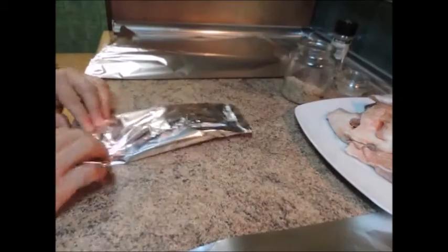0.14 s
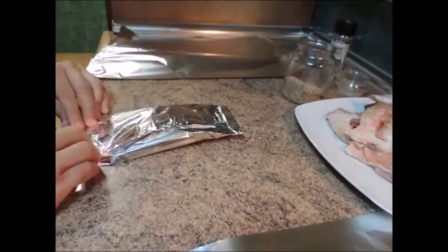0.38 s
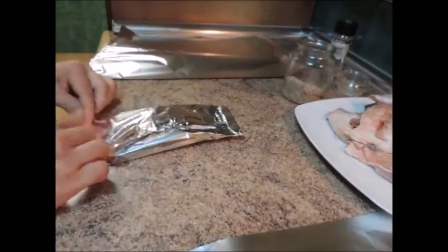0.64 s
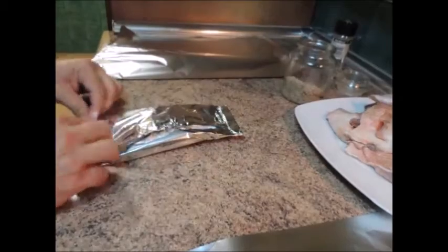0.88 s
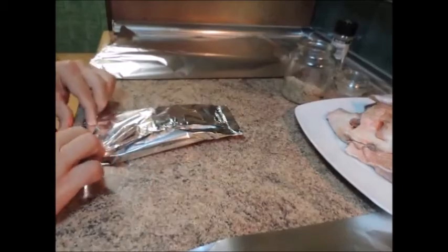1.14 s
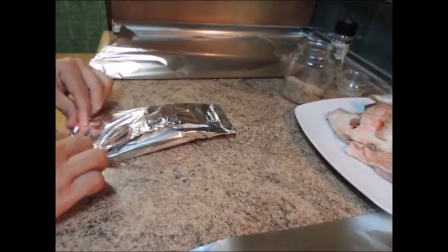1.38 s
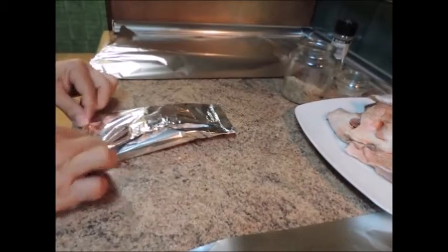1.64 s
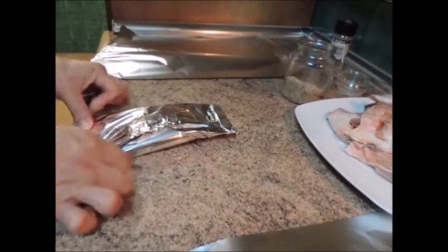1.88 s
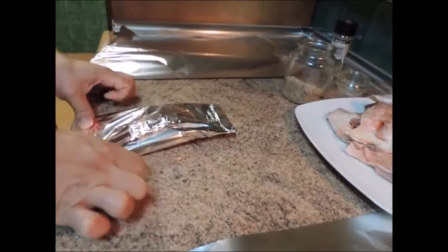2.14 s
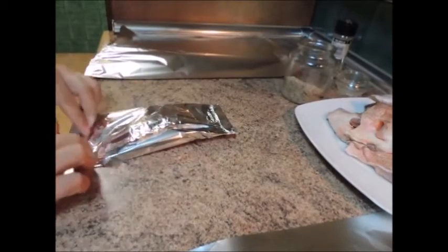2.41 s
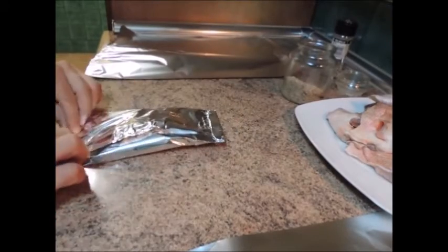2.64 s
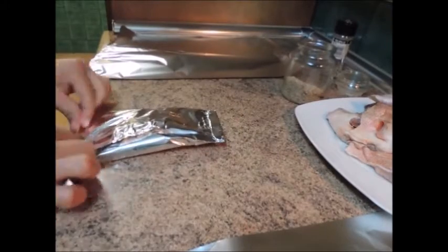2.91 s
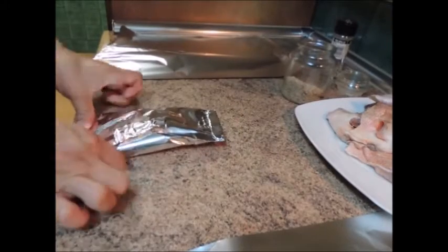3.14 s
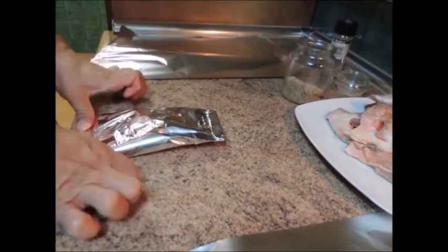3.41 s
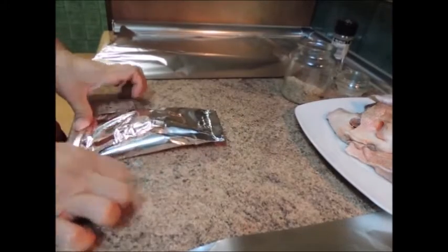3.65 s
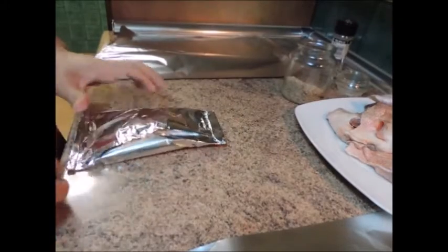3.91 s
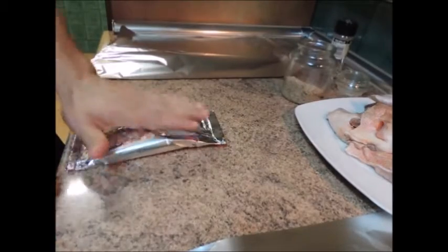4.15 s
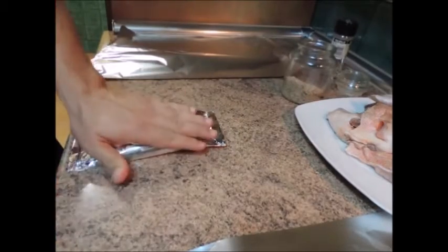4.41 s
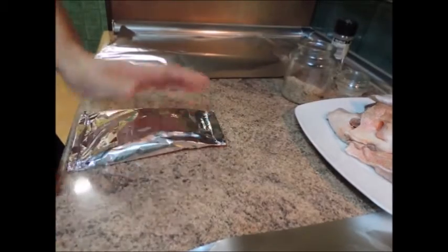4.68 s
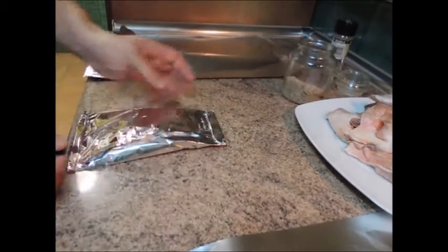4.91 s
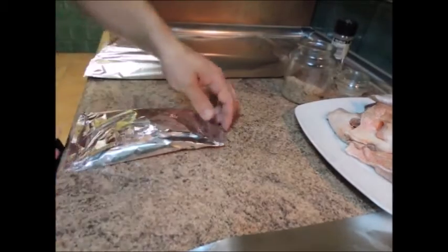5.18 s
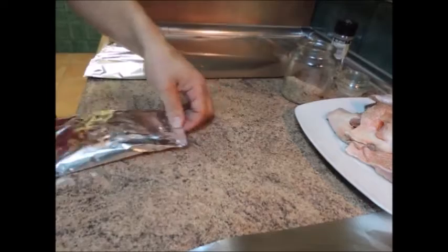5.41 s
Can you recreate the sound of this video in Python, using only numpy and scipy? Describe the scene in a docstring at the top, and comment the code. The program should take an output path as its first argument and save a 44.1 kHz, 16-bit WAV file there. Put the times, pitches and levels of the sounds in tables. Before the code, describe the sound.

Fingers crimp a foil packet shut: sharp opening crunches, then swarms of tiny metallic clicks with brief gaps. A hard snap lands around two and a half seconds, followed by dense crackle. Pressing gives another crisp cluster past four seconds, then near silence, a soft knock and a last burst. Two close microphones, short lively room reflections, low hiss and barely audible hum.

```python
"""Folding aluminium foil in a kitchen

Hands fold and crimp foil on a stone worktop in a small hard room. Each buckle is a click that sets many small
rings going; buckles come in swarms while a grip works the sheet and in short avalanches at big creases.
Fingers knock the worktop: rough bursts that set low rings going. The foil reaches the left of two close
microphones first. Behind it lie filtered noise as hiss and an appliance's faint hum, a ring fed with noise."""
import sys
import numpy as np
from scipy import signal
from scipy.io import wavfile

SR = 44100
rng = np.random.default_rng(int(sys.argv[2]) if len(sys.argv) > 2 else 0)


def invert_db(x):
    """Field ratio 10**(x/20) for x, a level in decibels (scalar or array-like)."""
    u = np.asarray(x, float) / 20
    return 10 ** u


def file_out(sig):
    """Save sig as 16-bit WAV at sys.argv[1]."""
    # one column per channel
    cols = np.atleast_2d(sig).T
    # limit, then scale
    lim = np.clip(cols, -1, 1)
    pcm = np.round(lim * 32767).astype(np.int16)
    wavfile.write(sys.argv[1], SR, pcm)


N = 244755   # length in samples

# big creases giving way: t/s, level/dB, fullness/dB (extra weight of the low rings), avalanche length/s
BIG_CREASES = [(0.031, -14.5, -7.5, 0.011), (0.098, -13, -6, .013), (0.123, -14, -3, 0.013),
               (0.2, -22, -1, .008), (0.243, -23.5, -7, 0.0059), (0.3, -25, -3, 0.0078),
               (0.481, -27.5, -5.5, 0.01), (0.607, -18.5, -4, .017), (0.81, -22, -2, .028),
               (0.91, -21, -3, 0.0099), (0.969, -18, -5, .019), (1.002, -19.5, -4, 0.012),
               (1.07, -27, -7, 0.0089), (1.177, -38, -4, 0.02), (1.241, -28, -0.5, .0093),
               (1.295, -30.5, -10, 0.0098), (1.355, -21.5, -31, .013), (1.442, -24.5, -14, 0.011),
               (1.557, -26, -8.5, 0.045), (1.619, -27.5, -8, 0.022), (1.747, -22, -8, 0.0097),
               (1.772, -18, -3.5, .0077), (1.862, -21.5, -18, 0.015), (1.897, -25, -.5, .019),
               (1.937, -19, -5.5, 0.019), (2.027, -23, -2.5, .014), (2.062, -20.5, 1, .025),
               (2.105, -16.5, -6, 0.008), (2.145, -25, -13, 0.01), (2.266, -29.5, -4.5, 0.015),
               (2.403, -24.5, -8.5, .021), (2.438, -28.5, 0.5, 0.0095), (2.502, -11.5, -4, 0.007),
               (2.659, -24.5, -6, 0.0087), (2.714, -21, -2.5, 0.01), (2.727, -21.5, -2.5, 0.0082),
               (2.777, -22.5, -5, 0.008), (2.831, -19.5, -2, 0.016), (2.867, -17.5, -34, 0.0092),
               (2.923, -21.5, -7, .0067), (2.948, -23.5, -5, 0.0098), (2.968, -18.5, -5, 0.0083),
               (2.985, -21.5, -4.5, 0.0067), (3.033, -21.5, -14, 0.0078), (3.095, -17, -8.5, .0094),
               (3.149, -22, -6, 0.01), (3.201, -23.5, -6, 0.025), (3.29, -23, -5, 0.012),
               (3.365, -24.5, 4.5, 0.0074), (3.466, -27, -12, 0.00634), (3.571, -18.5, -1.5, 0.0055),
               (3.665, -33, 3.5, .021), (3.754, -27.5, -8, 0.012), (3.83, -22.5, -3.5, 0.02),
               (3.941, -28, -9, 0.0074), (4.253, -26.5, -5, 0.022), (4.332, -28.5, 1, .0094),
               (4.361, -22, -1, 0.0095), (4.383, -21.5, -1, .039), (4.431, -22.5, -4, 0.012),
               (4.48, -24, -2, 0.017), (4.513, -19.5, -1, .015), (4.635, -21, 7.5, 0.0043),
               (4.676, -15, -4, 0.01), (4.821, -42, 6, .008), (5.156, -42.5, 7.5, 0.017),
               (5.248, -23.5, -5.5, 0.013), (5.326, -27.5, -2, .011), (5.429, -19.5, -6, 0.018),
               (5.468, -16, -21, .0069), (5.495, -28, -21, .005)]


def at_hz(points, hz):
    """Reads a table of (f/Hz, value) between its points, on a log-frequency axis."""
    table_hz, values = np.transpose(points)
    return np.interp(np.log(hz), np.log(table_hz), values)


def rms_one(x):
    """Scales a signal to rms 1."""
    return x / np.sqrt(np.mean(x ** 2) + 1e-20)


def ring(clicks, hz, t60):
    """A resonance: each unit click starts a sine of height 1 that falls by 60 dB in t60 seconds."""
    decay = invert_db(-60 / (t60 * SR))   # per sample
    turn = 2 * np.pi * hz / SR   # radians per sample
    return signal.lfilter([0, np.sin(turn)], [1, -2 * decay * np.cos(turn), decay ** 2], clicks + 1e-18)


def bands():
    """Half-octave band-pass filters from 16 Hz up, each with its centre in Hz."""
    edges = 16 * 2 ** np.arange(0, 10.1, .5)
    return [(np.sqrt(low * high), signal.butter(2, [low, high], "band", fs=SR, output="sos"))
            for low, high in zip(edges, edges[1:])]


def air():
    """Room and microphone hiss, most alike in both microphones in the bass, with a faint wavering hum."""
    # spectrum of the hiss before it is set to its overall level: f/Hz, level per Hz/dB
    hiss_spectrum = [(12, -33), (20, 2), (225, -4.5), (349, -7), (447, -6), (775, -11.5), (1580, -16.5),
                     (14300, -23.5)]
    # how alike left and right are: f/Hz, likeness (1 = the same, 0 = unrelated)
    likeness = [(40, 0.77), (200, 0.31), (1500, 0.3), (5000, 0.23)]
    hiss_db, hum_db = -49.5, -63   # rms levels
    white = rng.standard_normal((2, 2, N))
    hiss = 0
    for k, (hz, sos) in enumerate(bands()):
        mid, side = signal.sosfilt(sos, white[k % 2])   # neighbouring bands use separate noise
        alike = np.clip(at_hz(likeness, hz), -1, 1)
        both = np.sqrt(1 + alike) * mid + np.sqrt(1 - alike) * side * [[1], [-1]]
        hiss = hiss + invert_db(at_hz(hiss_spectrum, hz)) * both
    # noise keeps a resonance sounding, so its strength wavers
    hum = ring(rng.standard_normal((2, N)), hz=1575, t60=.06)
    return invert_db(hiss_db) * rms_one(hiss) + invert_db(hum_db) * rms_one(hum)


def kitchen(x, direct_db, scatter_db, scatter_t60, tail_db, alike_hz):
    """From one spot: direct sound, left first; scatter off worktop and walls; a tail dying band by band."""
    # how long the room rings: f/Hz, t60/s
    room_decay = [(500, 0.34), (4000, 0.31), (14000, 0.18)]
    t = np.arange(SR // 2) / SR
    noise = rng.standard_normal((2, 2, len(t)))
    scatter = noise[0] * invert_db(-60 * t / scatter_t60)
    tail = sum(signal.sosfilt(sos, noise[1]) * invert_db(-60 * t / at_hz(room_decay, hz)) for hz, sos in bands())
    tail = tail * np.clip(t / 0.009, 0, 1)   # the tail builds up over 9 ms
    parts = [(scatter_db, scatter), (tail_db, tail)]
    mid, side = sum(invert_db(db) * part / np.linalg.norm(part[0]) for db, part in parts)
    # lows reach both microphones alike
    side = signal.sosfilt(signal.butter(1, alike_hz, "high", fs=SR, output="sos"), side)
    path = np.array([mid + side, mid - side]) / np.sqrt(2)
    right_delay = rng.integers(2, 5)   # samples
    path[[0, 1], [0, right_delay]] += invert_db(direct_db)
    return signal.oaconvolve(x[None], path, axes=1)[:, :N]


def knocks(contact_s):
    """Soft fingertips land unevenly for a few milliseconds and set the worktop ringing low."""
    # fingers landing: t/s, strength of the whole push/dB
    landings = [(2.506, -20.5), (2.83, -32), (3.331, -36), (5.155, -27)]
    # rings of the worktop: f/Hz, level/dB, t60/s
    worktop_rings = [(111, -15, 0.047), (276, -8, .012), (610, 3, 0.003)]
    force = np.zeros(N)
    t = np.arange(SR // 20) / SR
    for start_s, strength_db in landings:
        rough = rng.standard_normal(len(t)) * np.exp(-t / contact_s)
        force[round(start_s * SR):][:len(t)] += invert_db(strength_db) * rough / np.linalg.norm(rough)
    return sum(invert_db(db) * ring(force, hz, t60) for hz, db, t60 in worktop_rings)


def grips():
    """Each grip swells, drifts from its first level to its last and eases off; small creases roughen it."""
    # fingers press and work the sheet: t/s, length/s, first level/dB, last level/dB,
    # fullness/dB (extra weight of the low rings)
    presses = [(0.022, 0.13, -24, -25.5, -2), (0.172, 0.28, -33, -32.5, -5),
               (0.483, 0.46, -29, -24.5, -5.5), (0.995, 0.085, -29, -37.5, 1), (1.17, 0.062, -43, -43.5, 2),
               (1.264, .46, -31, -33, -4), (1.761, .4, -29.5, -29, -3.5), (2.285, 0.083, -29.5, -38.5, -3),
               (2.402, 0.077, -31.5, -39.5, 0.5), (2.501, 0.11, -30, -34.5, -0.5),
               (2.646, .42, -35, -30.5, -2), (3.096, .35, -24.5, -33.5, -0.5),
               (3.583, .14, -41.5, -48.5, 3.5), (3.754, 0.11, -27.5, -27, -1.5), (4.232, 0.06, -45, -46, 4),
               (4.354, 0.2, -27, -28.5, 0.5), (4.646, 0.07, -25.5, -32.5, 2.5),
               (5.272, 0.098, -36.5, -32, -2), (5.409, 0.18, -24, -22.5, -1.5)]
    press_db_per_s, ease_db_per_s = 706, 299   # swelling before a grip, dying after it
    rest_db = -66   # the sheet at rest barely creaks
    small_per_s, small_db, small_s = 20, 2, 0.012   # small creases: rate, level over the grip, length
    t = np.arange(N) / SR
    power, full = np.full(N, invert_db(2 * rest_db)), np.zeros(N)
    for start_s, length, first_db, last_db, full_db in presses:
        end_s = start_s + length
        level_db = np.interp(t, [start_s, end_s], [first_db, last_db])
        level_db -= press_db_per_s * np.clip(start_s - t, 0, 1)
        level_db -= ease_db_per_s * np.clip(t - end_s, 0, 1)
        grip = invert_db(2 * level_db)   # twice the dB turns a level into power
        power += grip
        full += grip * full_db
    # small creases give way at random moments, with random strengths
    after = np.arange(SR // 20) / SR
    starts = (rng.random(N) < small_per_s / SR) * rng.exponential(1, N)
    fade = invert_db(2 * (small_db - 6 * (after / small_s) ** 2))
    small = 1 + signal.oaconvolve(starts, fade)[:N]
    return power * small, full * small


def effort(rise_s):
    """Power of the buckling and its fullness in dB: the grips plus each avalanche, which runs on, then stops."""
    power, full = grips()
    t = np.arange(N) / SR
    for start_s, crease_db, crease_full_db, length in BIG_CREASES:
        first = max(round((start_s - 6 * rise_s) * SR), 0)
        span = slice(first, round((start_s + 3 * length) * SR))
        after = t[span] - start_s
        rise_db = 8 * after / rise_s
        fall_db = -6 * (after / length) ** 2
        burst = invert_db(2 * (crease_db + np.where(after < 0, rise_db, fall_db)))
        power[span] += burst
        full[span] += burst * crease_full_db
    return power, full / power   # fullness is averaged by power


def foil(per_s, busier, spread_db, cycles, colour_db, shift_db, shift_s, packet_db, snap_db):
    """Each buckle is a click ringing briefly in many small facets, with a colour of its own.

    Returns the motion of the sheet and the moments of the buckles."""
    # weight of the facet rings by pitch: f/Hz, level/dB
    facet_weights = [(290, -34), (500, 3), (1410, 6.5), (4500, 11), (13400, 12.5), (14200, 12)]
    # rings of the closed packet: f/Hz, level/dB, t60/s
    packet_rings = [(861, -3, 0.068), (1424, -6, 0.11), (1650, -11, 0.032), (1976, 0, 0.027),
                    (2500, -13, 0.055)]
    let_go_s, let_go_db = 4.821, -22   # the palm lifts and the packet springs back with one tick
    power, full_db = effort(rise_s=0.0026)
    # more effort, denser clicks
    chance = np.clip(per_s / SR * (power / np.mean(power)) ** busier, 8e-3, .5)
    born = rng.random(N) < chance
    size = rms_one(invert_db(spread_db * np.minimum(rng.exponential(1, N), 4)))
    size = size * np.sqrt(power / chance)   # keeps the power right however dense the clicks are
    for start_s, crease_db, _, length in BIG_CREASES:   # an avalanche opens with one clear snap
        snap = round(start_s * SR)
        born[snap] = True
        size[snap] = invert_db(crease_db + snap_db) * np.sqrt(length * SR)
    at = np.flatnonzero(born)
    size = size[at]
    colour = rms_one(invert_db(colour_db * rng.standard_normal(2 * N)))
    colour = colour * rng.choice([-1, 1], 2 * N)

    def strike(gain, hz, t60):
        """All buckles strike one ring; folding reshapes the sheet, so its weight slowly wanders."""
        shift = np.interp(at / (SR * shift_s), np.arange(1000), rng.standard_normal(1000))
        own_colour = colour[at + rng.integers(N)]   # each ring reads its own stretch
        clicks = np.zeros(N)
        clicks[at] = size * gain * own_colour * invert_db(shift_db * shift)
        return ring(clicks, hz, t60)

    unit = signal.unit_impulse(SR // 10)
    energy, motion = 0, 0
    for hz in np.geomspace(450, 15000, num=24):
        height = invert_db(at_hz(facet_weights, hz))
        t60 = cycles / hz
        energy += np.sum(np.diff(ring(height * unit, hz, t60)) ** 2)
        lowness = np.clip(np.log2(8000 / hz) / 2, 0, 1)   # 1 up to 2 kHz, 0 from 8 kHz
        motion = motion + strike(height * invert_db(full_db[at] * lowness), hz, t60)
    motion = motion / np.sqrt(energy)   # evens out the energy that one unit click radiates
    tick = signal.unit_impulse(N, round(let_go_s * SR))
    for hz, level_db, t60 in packet_rings:   # the closed packet hums along
        motion = motion + strike(invert_db(full_db[at] + packet_db + level_db), hz, t60)
        motion = motion + ring(invert_db(let_go_db + level_db) * tick, hz, t60)
    return motion, at


def scene(count=6):
    """Every buckle sounds from one of several spots on the sheet, each with its own path to the microphones."""
    motion, at = foil(per_s=2200, busier=.4, spread_db=2.0, cycles=4.04, colour_db=7.0, shift_db=4.5,
                      shift_s=.04, packet_db=-26.5, snap_db=-7.5)
    # each sample belongs to the spot of the latest buckle before it
    latest = np.maximum(np.searchsorted(at, np.arange(N)) - 1, 0)
    spot = rng.integers(0, count, N)[at][latest]
    room = dict(direct_db=-5.5, scatter_db=-2.5, scatter_t60=.028, tail_db=-4.5, alike_hz=1510)
    crackle = sum(kitchen(motion * (spot == k), **room) for k in range(count))
    crackle = np.diff(crackle, prepend=0)   # a small sheet radiates in proportion to pitch
    crackle = signal.sosfilt(signal.butter(2, 350, "high", fs=SR, output="sos"), crackle)
    crackle = crackle * invert_db(np.array([[-.4], [.4]]))   # left and right level in dB
    thuds = signal.sosfilt(signal.butter(2, 90, "high", fs=SR, output="sos"), knocks(contact_s=0.013))
    thuds = kitchen(thuds, **{**room, "direct_db": -1.5, "tail_db": -11})
    return crackle + thuds + air()


def roll_off(x):
    """The treble ends steeply here."""
    return signal.sosfilt(signal.butter(12, 15480, fs=SR, output="sos"), x)


def record(dry):
    """A steep low-pass removes the top of the treble, from 14550 Hz up."""
    top_cut = signal.cheby2(16, 55, 14550, fs=SR, output="sos")
    mix = signal.sosfilt(top_cut, dry)
    return roll_off(mix)


dry = scene()
out = record(dry)
file_out(out)
```